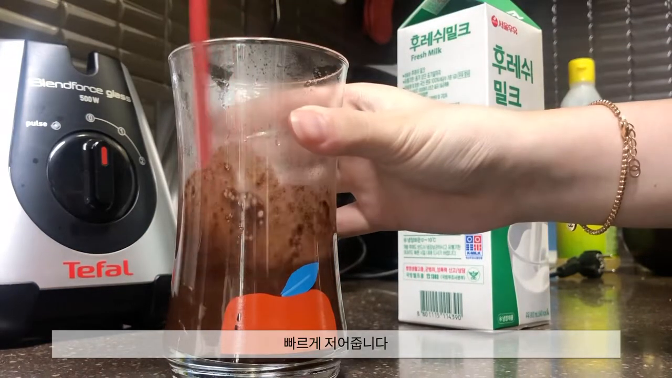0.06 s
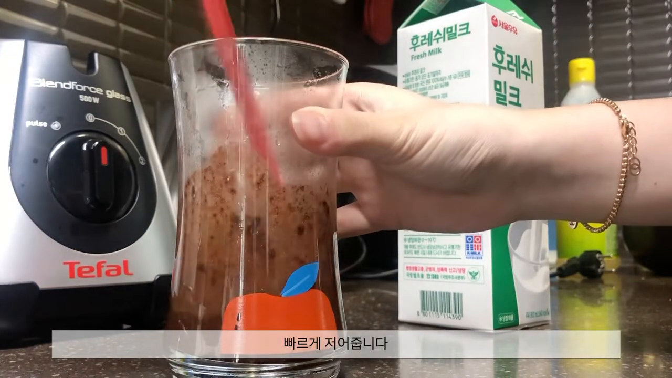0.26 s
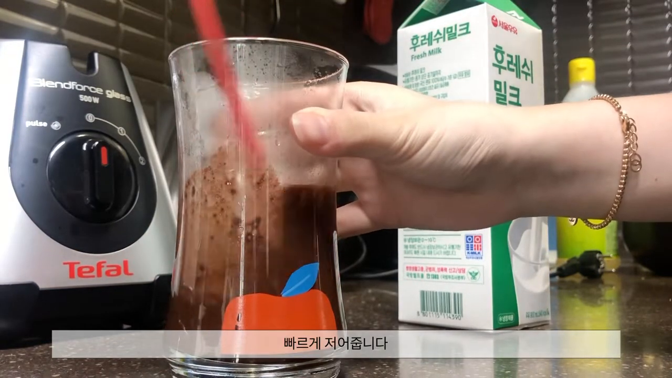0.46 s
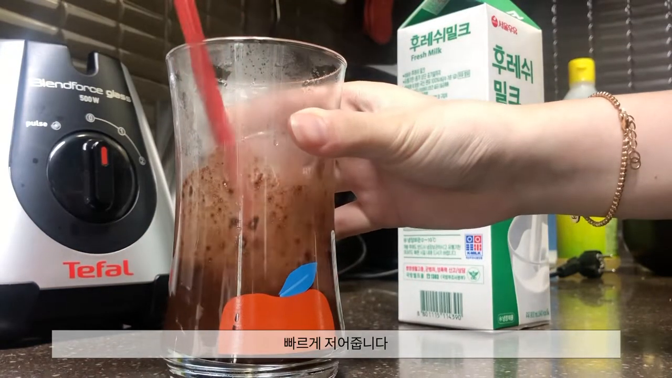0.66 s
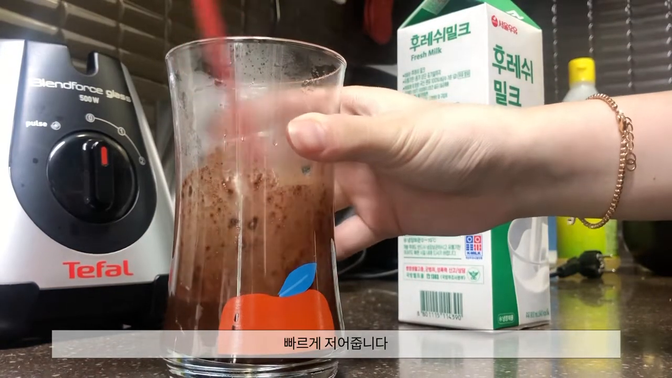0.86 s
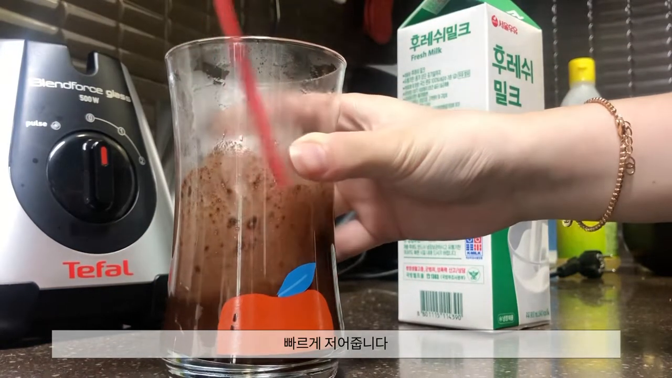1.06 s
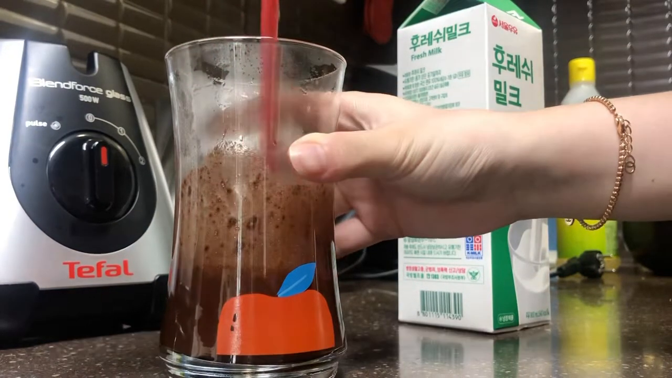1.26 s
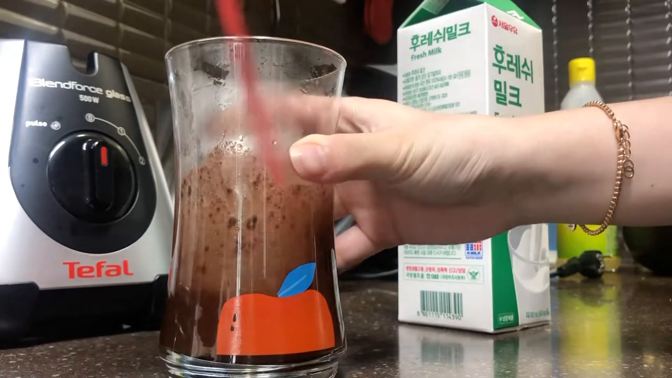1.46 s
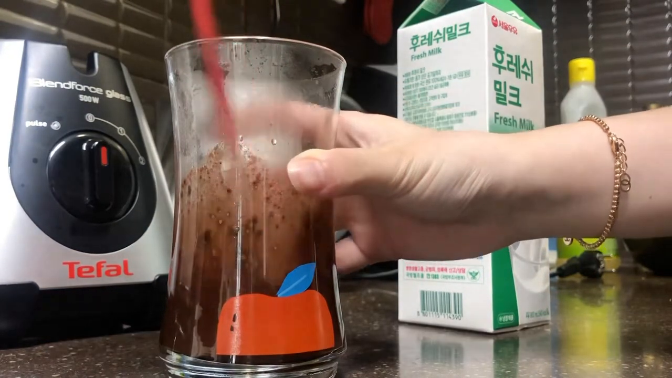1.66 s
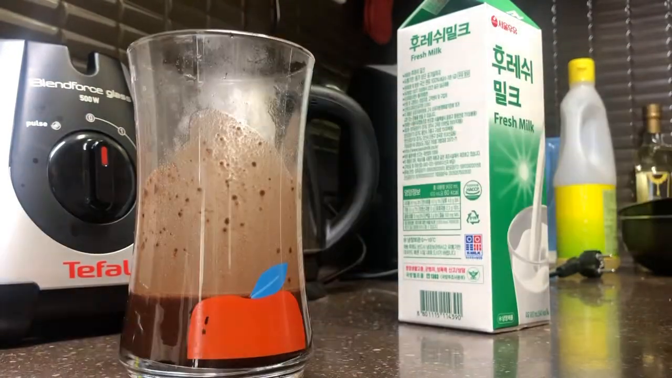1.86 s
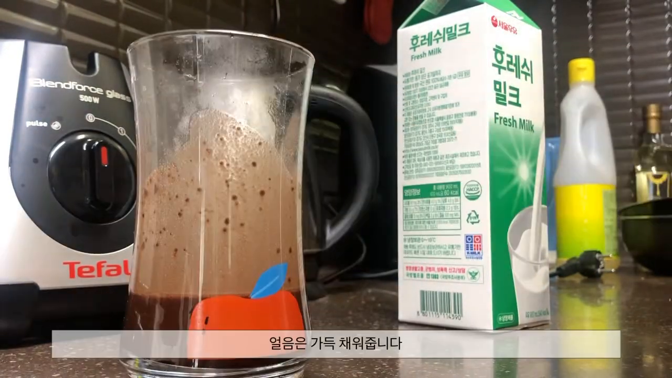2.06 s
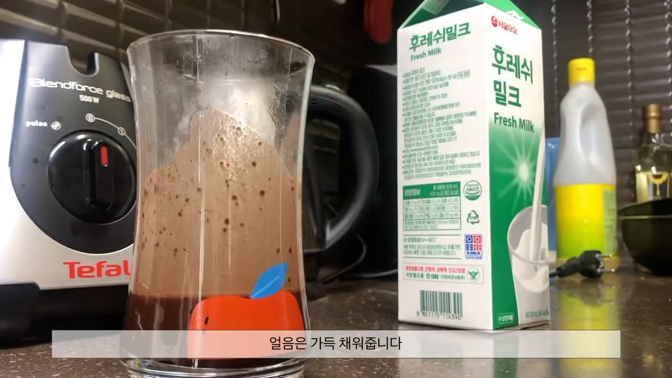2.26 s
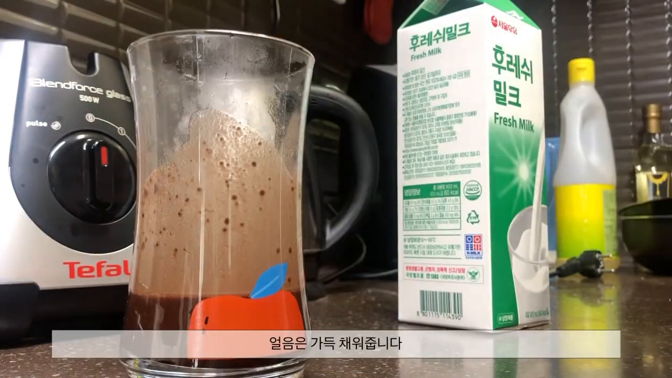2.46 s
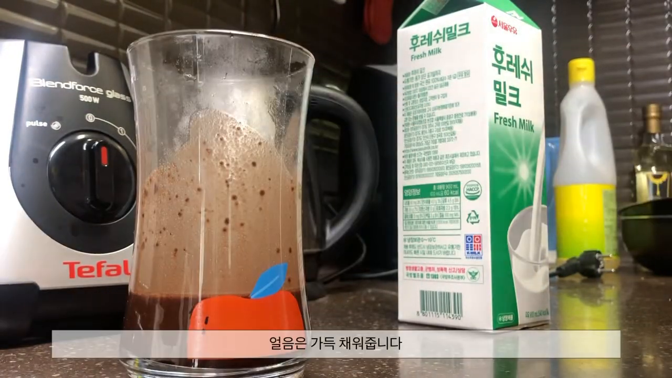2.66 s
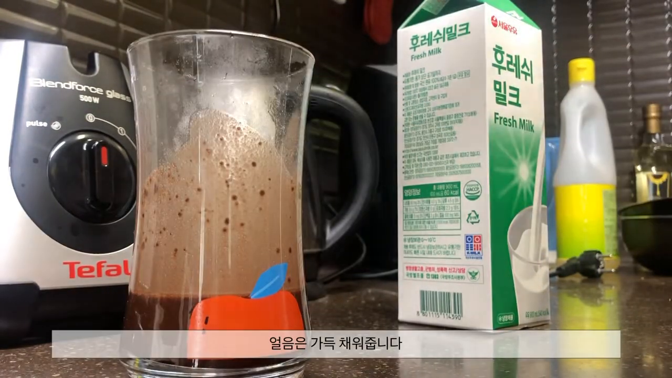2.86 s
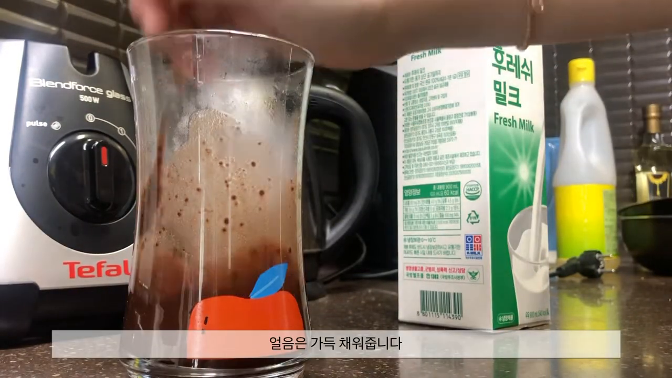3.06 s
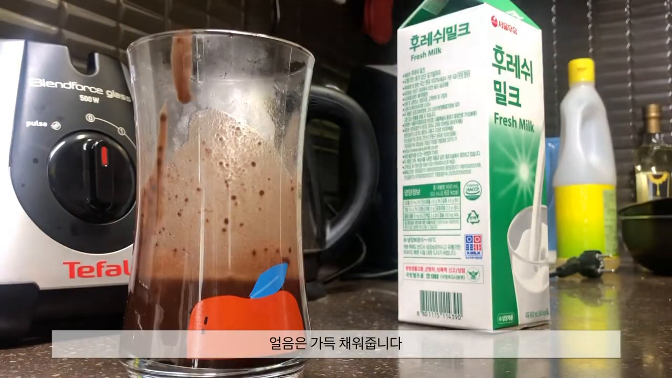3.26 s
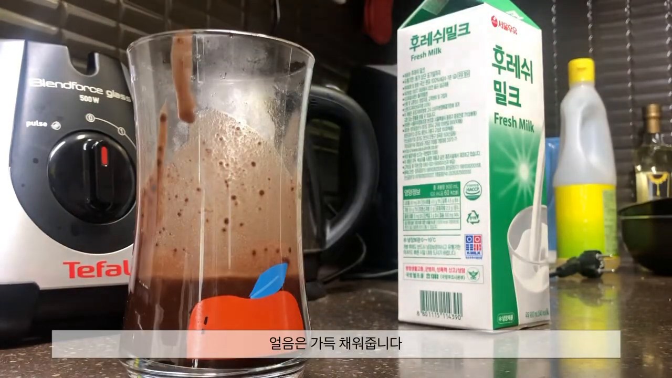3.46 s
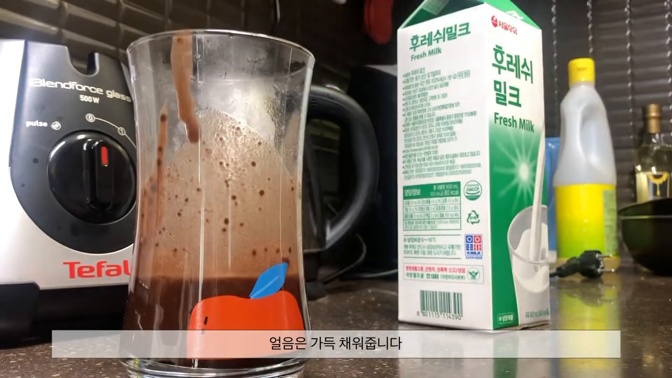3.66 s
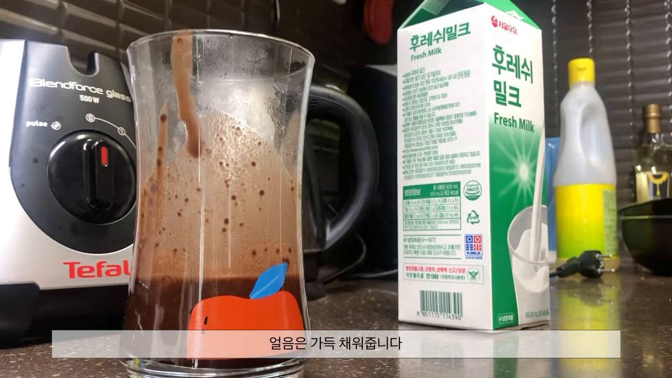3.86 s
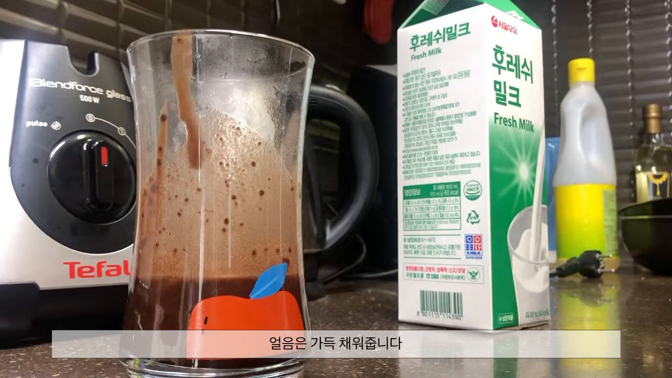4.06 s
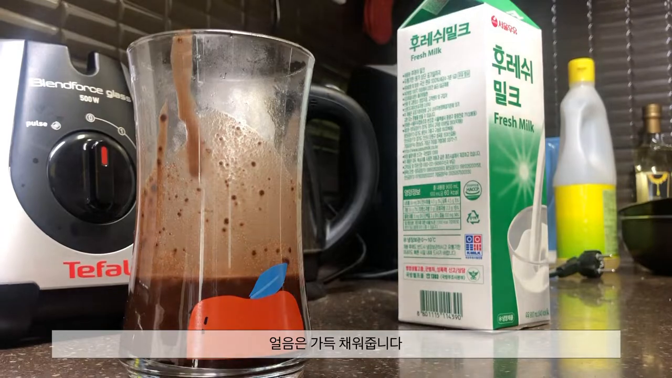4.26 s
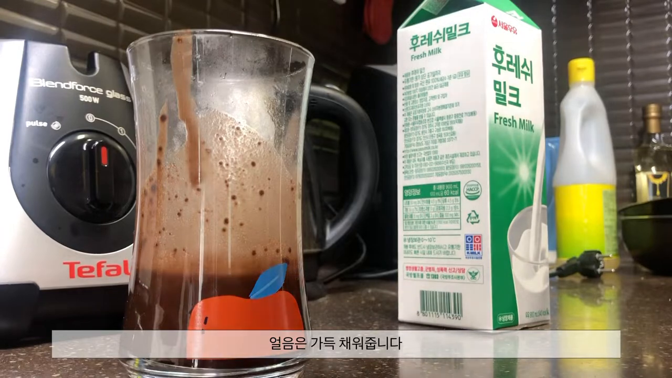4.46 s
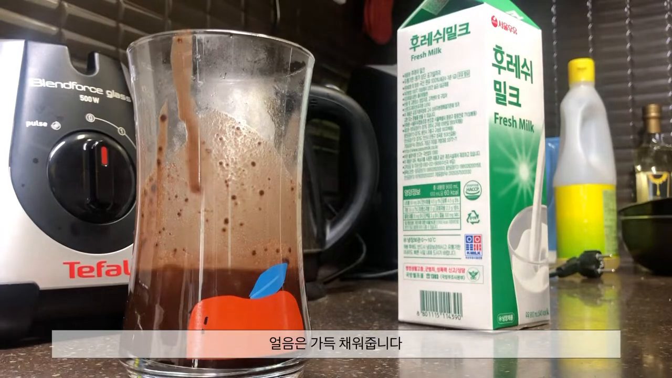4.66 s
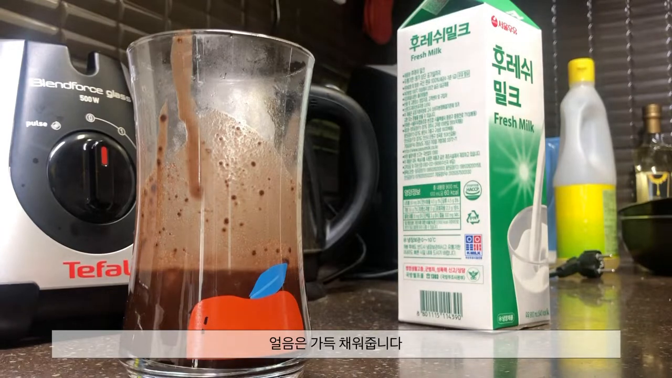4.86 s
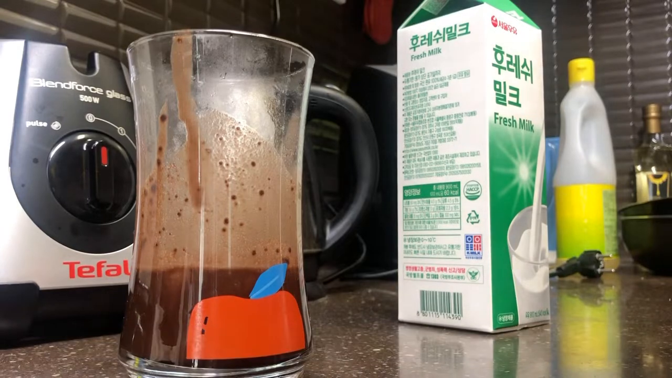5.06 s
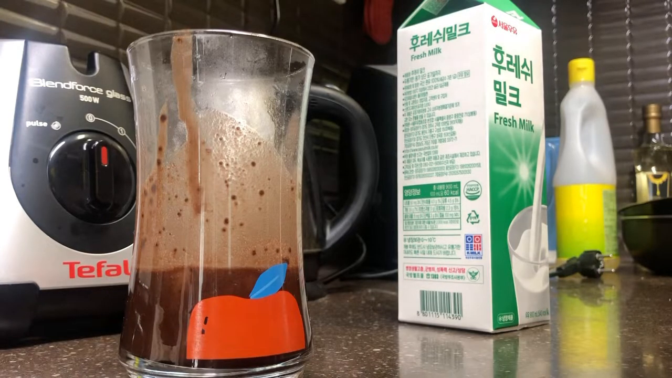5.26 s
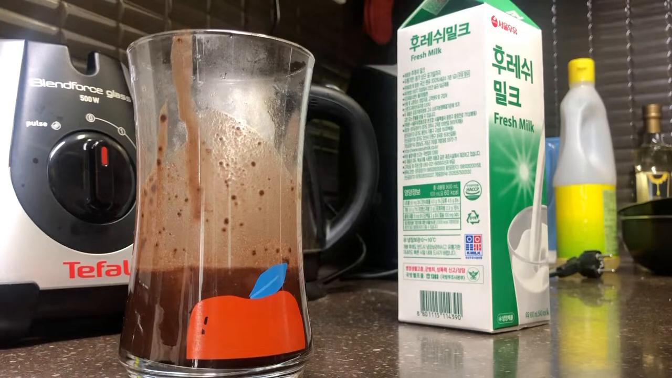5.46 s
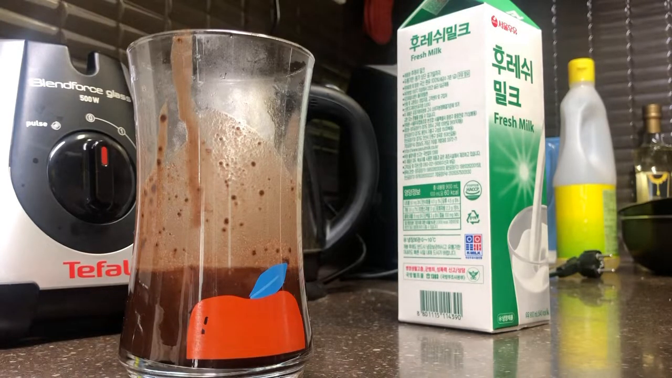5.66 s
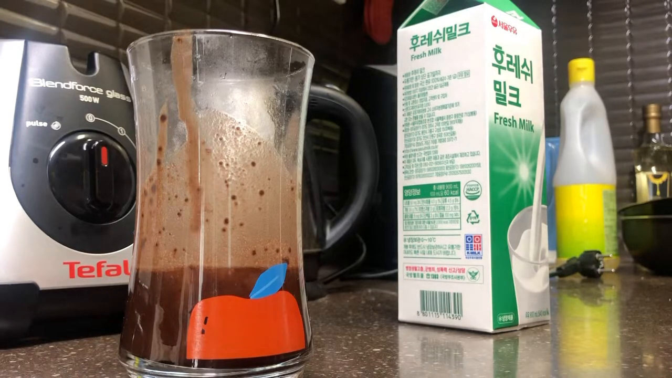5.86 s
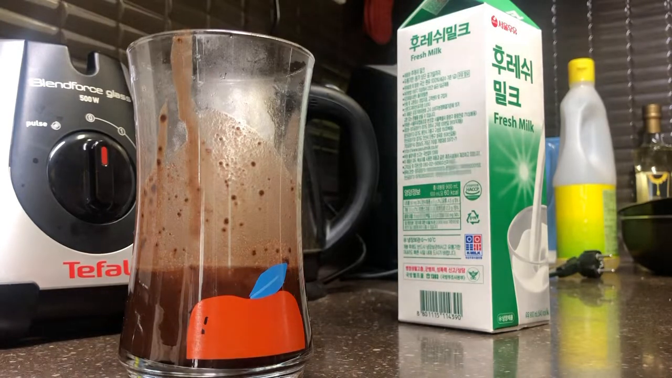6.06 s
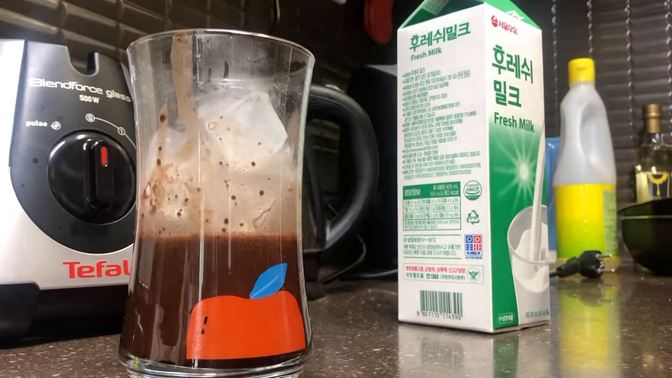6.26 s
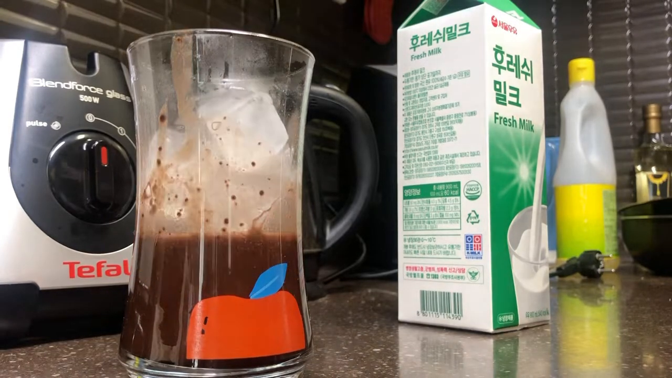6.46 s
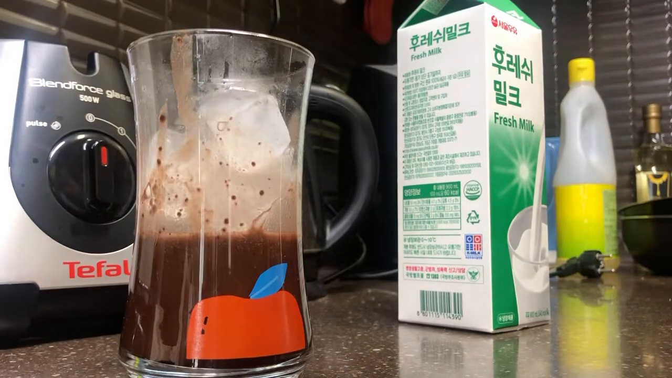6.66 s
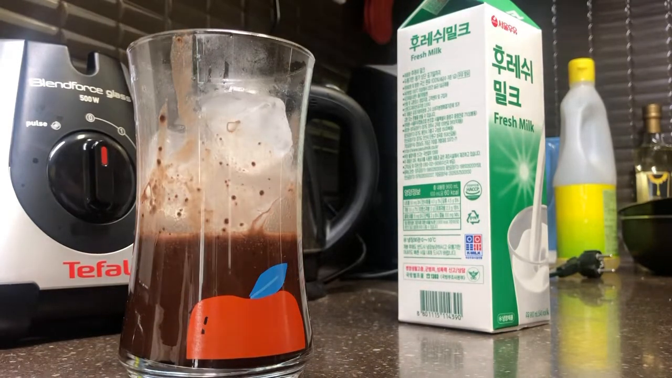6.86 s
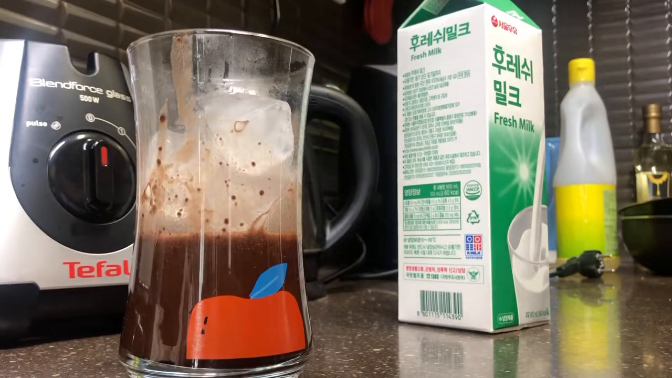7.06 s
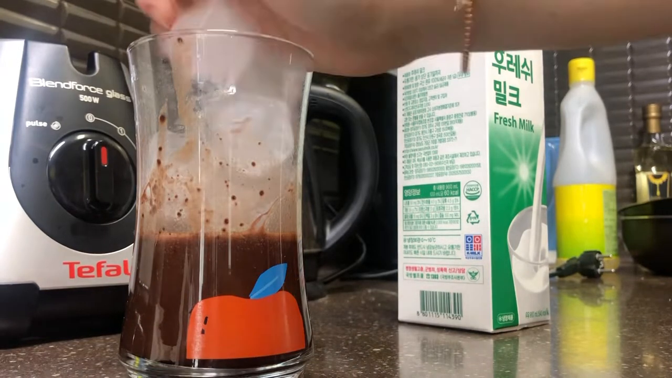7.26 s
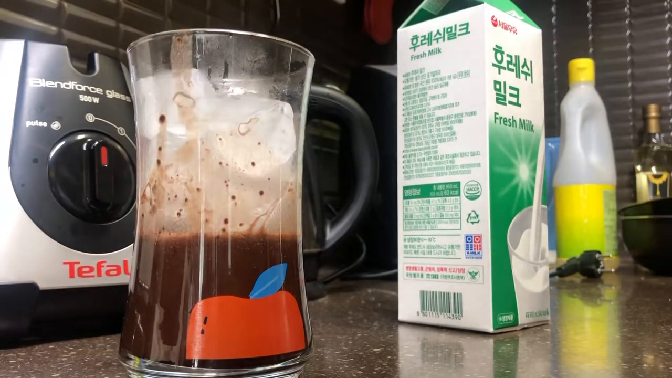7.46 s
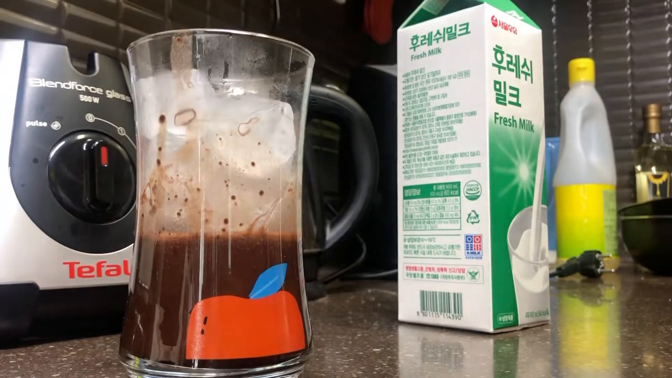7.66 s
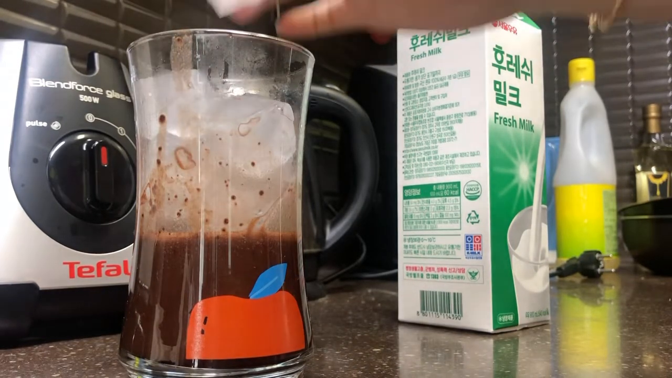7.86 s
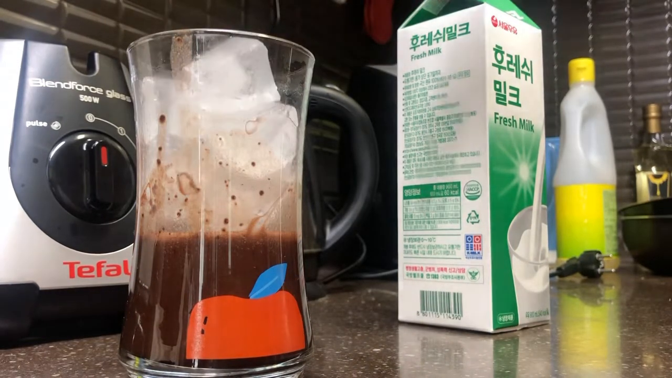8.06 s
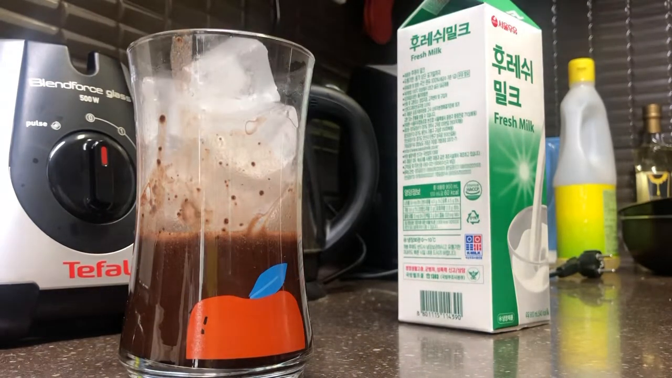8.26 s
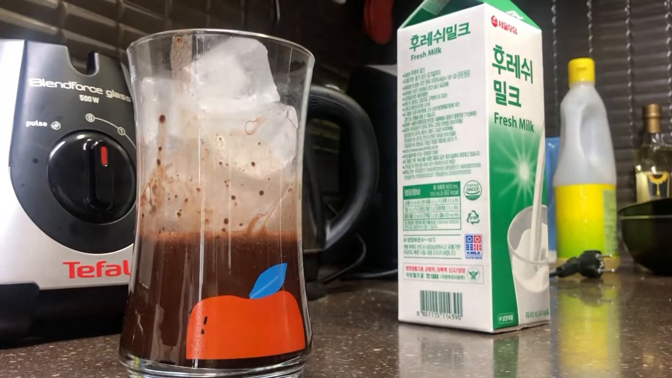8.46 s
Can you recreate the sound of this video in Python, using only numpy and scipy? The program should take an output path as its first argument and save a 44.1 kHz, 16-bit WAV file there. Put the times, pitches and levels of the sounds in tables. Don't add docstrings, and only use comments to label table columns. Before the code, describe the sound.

A close phone microphone in a small tiled kitchen, with faint refrigerator hum and short reflections. From 0 to 1.7 s a plastic spoon stirs quickly in a tall wet glass: irregular hollow knocks, light ticks, brief scrapes and swirling liquid, strongest around 0.5 to 1.0 s, then sparser. At 1.7 s an abrupt cut. A plastic bag crackles, busiest at 2.2 to 2.6 s, and ice cubes clatter into the glass at 2.9 to 3.2 s with hard knocks and bright ringing. More crinkling at 3.4 to 4.1 s, a sharp drop at 4.3 s, rustling from 4.8 to 5.9 s. A dense clatter at 6.13 s is cut off at 6.25 s. Crisp crackling at 6.6 to 7.0 s, a glassy but short drop at 7.25 s, snaps at 7.5 to 7.7 s, and a soft, dull last drop at 7.92 s. Then near quiet until about 8.6 s.

```python
import sys
import numpy as np
from scipy import signal
from scipy.fft import rfft, irfft, next_fast_len
from scipy.io import wavfile
from scipy.ndimage import uniform_filter1d

SR = 44100
rng = np.random.default_rng(int(sys.argv[2]) if len(sys.argv) > 2 else 0)


def generate_wav(sig):
    pcm = np.round(np.clip(np.atleast_2d(sig).T, -1, 1) * 32767).astype(np.int16)
    wavfile.write(sys.argv[1], SR, pcm)


def natural_amplitude(level_db):
    exponent = np.asarray(level_db, float) / 20
    return 10 ** exponent


N = 375732

CUT_S, TRIM_S = 1.715, 6.2545
LOW_CUT_HZ, TOP_HZ = 390, 16150
SMOTHER_DB = -8
CREASE_MS, CREASE_SCATTER_DB, COLOUR_SCATTER_DB = 5.5, 4, 12.5
TICK_MS = 5.1
CRUMPLE_DB, CRUMPLE_EDGE_S = -16, 0.017

# (frequency [Hz], level [dB per Hz])
AIR = [(15, -91), (25, -56.5), (124, -12.5), (399, -10.5), (538, -14.5), (726, -5.5), (831, -15.5),
       (1780, -18), (16500, -57)]
AIR_DB = -58.5
# (frequency [Hz], width [Hz], level [dB])
FRIDGE = [(135, 14, -74), (255, 16, -72), (732, 28, -66.5), (1065, 16, -71)]
# (frequency [Hz], t60 [s])
TILES = [(300, 0.11), (2000, 0.19), (6000, 0.094), (15000, 0.2)]

# (time [s], swirl [dB], fizz [dB], thrum [dB])
SLOSH = [
    (0.0, -43, -68, -84),
    (0.736, -40.5, -66, -72),
    (1.72, -49.5, -71, -92),
]
# (frequency [Hz], level [dB per Hz])
SWIRL = [(120, -11.5), (250, 0.5), (420, 4), (750, -3), (1200, -0.5), (1700, -13), (4000, -24), (8000, -73)]

# (time [s], blow [dB], tick [dB], glass ring [dB], handle pitch [Hz])
STIR = [(0.037, -43, -54, -57, 1160), (0.04, -28, -43, -55.5, 1170), (0.0558, -36.5, -41.5, -76, 1140),
        (.078, -45, -40, -45, 1200), (0.138, -55, -45.5, -54, 1150), (.144, -29.5, -42.5, -35.5, 835),
        (0.234, -28.5, -47, -38, 850), (0.2534, -31, -51.5, -45, 1020), (0.3166, -21.5, -20.5, -25, 510),
        (.345, -34.5, -64, -56, 377), (.4165, -32, -50.5, -46.5, 1200), (.459, -21.5, -18.5, -30, 530),
        (0.4732, -12.5, -41, -37.5, 580), (0.527, -41, -41.5, -42.5, 500), (0.568, -39, -50, -44, 805),
        (.607, -14, -16, -27, 503), (0.619, -16, -47, -39.5, 490), (0.667, -37, -37.5, -51.5, 720),
        (0.7107, -23.5, -35, -38, 675), (0.7569, -12, -17, -29, 508), (0.809, -19, -35, -20.5, 540),
        (0.828, -26, -40, -70, 795), (.873, -29.5, -43.5, -45, 1200), (0.9055, -15, -16, -25, 550),
        (0.9242, -7, -40.5, -26, 580), (0.966, -16.5, -30.5, -15, 830), (1.026, -33.5, -49, -47.5, 1160),
        (1.1403, -27.5, -28, -27.5, 450), (1.202, -49, -38.5, -38.5, 1110),
        (1.266, -38.5, -51.5, -46, 1170), (1.299, -29.5, -41.5, -35, 1150), (1.373, -34, -67, -38, 1085),
        (1.445, -25.5, -45.5, -43, 475), (1.4917, -32, -59, -42, 860), (1.526, -30, -21.5, -28, 487),
        (1.5489, -19, -30, -32.5, 513), (1.5786, -26.5, -57, -35, 1040), (1.6234, -23, -36, -33, 460)]
# (time [s], length [s], level [dB])
SCRAPES = [
    (0.034, 0.054, -41.5),
    (0.415, 0.026, -41),
    (1.297, 0.032, -42.5),
    (1.8, 0.03, -59),
]
# (time [s], body [dB], rim [dB])
CLINKS = [
    (.001, -34.5, -55),
    (0.809, -46, -40),
    (0.97, -44, -22),
]
# (frequency [Hz], level [dB], t60 [s])
WET_GLASS = [(2660, 2, 0.024), (3546, -13.5, 0.02), (4370, -19, 0.0059), (1200, -10, 0.027)]
# (frequency [Hz], level [dB], t60 [s])
WET_RIM = [(8550, -4, 0.017), (11800, -1.5, 0.012), (12500, -9.5, 0.037), (7900, -18.5, 0.029),
           (5370, -12.5, 0.028)]

# (start [s], length [s], crackle [dB], treble over bass [dB])
GRABS = [(2.27, 0.023, -41, -13.5), (2.341, 0.15, -40.5, -13), (2.434, 0.17, -48.5, -10.5),
         (2.78, 0.089, -60, 22), (3.409, 0.059, -44.5, 2.5), (3.506, 0.17, -53.5, -7.5),
         (5.581, .13, -53, -24), (3.749, 0.064, -59, 16), (3.93, 0.1, -39, 2), (4.927, 0.039, -35.5, -6.5),
         (5.031, 0.13, -47.5, -5), (5.239, 0.19, -45.5, -11.5), (5.755, 0.08, -36, -18),
         (5.86, 0.064, -43.5, -25.5), (6.589, 0.086, -44, 29.5), (6.685, 0.087, -35.5, -1),
         (6.799, .07, -38, 1), (6.873, .1, -38.5, 4), (7.603, 0.087, -47.5, 33.5)]
# (time [s], peak [dB], treble over bass [dB], length [ms])
SNAPS = [(2.418, -28.5, -0.5, 6.6), (2.4391, -28, 2, 15), (2.4732, -26.5, -3.5, 6), (2.5275, -24, 9, 5.5),
         (3.7334, -50.5, 14, 10), (3.779, -37.5, 22, 5.5), (3.8052, -37.5, 11.5, 45), (3.9511, -39, 6, 84),
         (4.0612, -32.5, 1, 17), (4.926, -33, 1, 13), (4.9473, -23.5, 14, 6), (5.0397, -28, -5.5, 5.9),
         (5.069, -21, 7.5, 3), (5.1461, -30, -6, 2.3), (5.765, -26.5, 0, 13), (5.783, -23, -6.5, 30),
         (5.851, -28, -21, 53), (6.5902, -32.5, 9, 8.9), (6.623, -31, 6.5, 10), (6.7222, -24, 24.5, 1.2),
         (6.832, -26.5, -0.5, 5.4), (6.86, -29, -6, 11), (6.935, -32, -1.5, 15), (6.9629, -33.5, 3.5, 2.2),
         (6.984, -35, 9, 25), (7.6047, -24, -1.5, 20), (7.661, -26.5, 1, 44)]
# (time [s], peak [dB], treble over bass [dB])
TICKS = [(1.746, -27, 0), (1.883, -40.5, -0.5), (2.1418, -35.5, -10), (2.249, -41.5, 4.5),
         (2.611, -36, -10), (3.2794, -41, -11), (3.342, -44.5, 0), (3.5585, -39.5, -12), (3.8361, -33.5, 4),
         (3.9005, -22.5, 3.5), (4.5744, -38, -8.5), (4.7257, -35.5, -8.5), (4.8121, -20, 13),
         (4.873, -25, 5), (5.495, -38.5, -9.5), (5.5518, -31, -29), (6.262, -43.5, 2.5),
         (6.2766, -40, -1.5), (6.2982, -51, 11), (6.376, -33.5, -9), (6.4648, -36, 4), (6.5291, -34, 4.5),
         (7.017, -23.5, -6), (7.4053, -42.5, -1), (7.4366, -32.5, -1), (7.4646, -31, 25), (7.509, -51, 15),
         (7.534, -24, -4.5), (7.571, -41, 13), (8.443, -45, -2)]
# (frequency [Hz], level [dB per Hz])
FILM = [(290, -45.5), (500, 5), (1890, 2), (3800, 3), (6500, 1), (8500, 0), (15100, -8.5), (16500, -18)]
# (time [s], treble [dB], bass
# [dB])
CRACKS = [(2.2343, -33.5, -54.5), (2.2503, -25, -46.5), (2.3506, -31.5, -42.5), (2.365, -30.5, -47.5),
          (2.392, -47, -40), (2.3972, -22.5, -39.5), (2.417, -25, -32), (2.4404, -26, -28),
          (2.449, -29, -36), (2.4718, -20, -30), (2.482, -31, -32.5), (2.488, -24.5, -32),
          (2.521, -30, -37.5), (2.537, -18.5, -42.5), (2.55, -26.5, -41.5), (2.5985, -41.5, -44),
          (3.7331, -20, -41.5), (3.7517, -31, -47.5), (3.7693, -22.5, -51), (3.778, -15, -58),
            (3.8104, -21, -42.5), (3.8358, -24.5, -41), (3.9029, -21.5, -37), (3.9372, -27, -50),
            (3.953, -27.5, -41.5), (4.0071, -32, -40), (4.058, -28, -42),
          (4.9253, -23, -42), (4.9458, -23, -37.5), (4.963, -27, -37.5), (5.0006, -35.5, -41),
            (5.0196, -30.5, -33.5), (5.032, -30.5, -34), (5.0426, -24.5, -35.5), (5.0675, -18.5, -44),
            (5.101, -37, -37), (5.1234, -30, -41), (5.1458, -23, -40), (5.169, -33.5, -36.5),
            (5.182, -29, -47.5), (5.2496, -32, -39.5), (5.2576, -34, -45.5), (5.269, -35.5, -45),
            (5.3103, -39.5, -51.5), (5.3369, -32, -42), (5.3608, -29.5, -36),
          (5.7558, -22, -33.5), (5.7668, -26, -38.5), (5.7822, -30.5, -33.5), (5.8457, -40, -27),
            (5.8555, -33.5, -36), (5.9113, -41.5, -45),
          (6.5906, -21.5, -46.5), (6.6232, -25.5, -47), (6.6698, -22.5, -41.5), (6.6905, -22, -37),
            (6.7211, -13, -45), (6.7989, -25.5, -57), (6.8201, -20, -31.5), (6.8323, -18.5, -52),
            (6.8653, -20.5, -33.5), (6.9225, -33, -44), (6.9305, -36.5, -45.5), (6.9616, -17, -47),
            (6.9851, -22.5, -43), (7.0219, -30.5, -30),
          (7.6025, -25, -65),
    (7.6623, -25.5, -55),
          (3.7616, -22.5, -50), (6.6026, -25.5, -45), (6.6355, -23.5, -40), (6.6524, -24.5, -43.5),
            (6.6996, -21.5, -45), (6.7368, -21.5, -37.5), (6.7674, -27.5, -49.5), (6.8106, -23.5, -39),
            (6.844, -23, -37), (6.8876, -31, -54), (7.6246, -32, -44), (7.6855, -25, -50.5)]

# (time [s], tick [dB], knock pitch [Hz], knock [dB], bowl [dB])
DROP_1 = [(2.9317, -20.5, 1600, -8.5, -24), (2.9518, -55, 1520, -34.5, -24),
          (2.979, -18.5, 1570, -25.5, -19), (2.9957, -49, 1724, -29.5, -49),
          (3.0044, -27.5, 1860, -17, -28), (3.0335, -40.5, 1690, -34.5, -48.5),
          (3.0426, -32, 730, -34, -29), (3.0738, -24.5, 1940, -4.5, -40.5), (3.0808, -17, 1800, -16, -14.5),
          (3.1084, -37, 1990, -13.5, -34.5), (3.1956, -52.5, 1840, -38, -48),
          (3.2112, -73, 1960, -34, -41.5)]
DROP_2 = [(4.3243, -44.5, 1936, -16, -21), (4.33, -11.5, 2000, -4.5, -18.5),
          (4.3397, -25.5, 2120, -10, -21), (4.3465, -34.5, 1600, -22.5, -32),
          (4.3922, -57.5, 2140, -37.5, -43.5), (4.4405, -63, 1890, -37, -47), (4.47, -41, 1840, -33, -32.5),
          (4.5158, -40, 610, -34, -71), (5.2509, -67, 549, -30, -78)]
DROP_3 = [(6.1275, -18, 1864, -19.5, -18.5), (6.1484, -12.5, 1980, -20, -14.5),
          (6.155, -19.5, 1744, -24, -19), (6.1749, -20, 1800, -5.5, -40.5),
          (6.1821, -13, 1954, -11.5, -25.5), (6.2001, -31.5, 1797, -17.5, -24.5),
          (6.2226, -25, 1352, -9.5, -30), (6.2252, -17.5, 2260, -5.5, -14.5),
          (6.2355, -36, 1280, -21.5, -20.5), (6.241, -25.5, 1126, -22, -10),
          (6.2476, -31, 2140, -16, -35.5)]
DROP_4 = [(7.242, -16.5, 2206, -14, 1.5), (7.2565, -46, 1255, -27.5, -30), (7.262, -24, 1480, -23.5, -24),
          (7.2665, -13, 905, -16.5, -18.5), (7.2768, -30.5, 1115, -27, -26),
          (7.2857, -31, 1223, -24.5, -42.5), (7.294, -35, 2088, -32, -40), (7.299, -23.5, 2020, -31, -20.5),
          (7.312, -20.5, 1174, -22.5, -9.5)]
DROP_5 = [(7.9194, -24.5, 2234, -24, -54), (7.925, -34.5, 590, -23.5, -18), (7.931, -46, 1108, -28, -48),
          (7.9388, -46.5, 1430, -28.5, -43), (7.9479, -36, 690, -30.5, -54),
          (7.958, -42.5, 660, -31.5, -45)]
DROPS = [DROP_1, DROP_2, DROP_3, DROP_4, DROP_5]
FREEDOM = [1, .78, .7, .2, .2]
# (time [s], pitch [Hz], level [dB])
PINGS = [
    (2.932, 1680, -28),
    (3.0085, 1590, -22),
]
# (time [s], rim [dB], lip [dB], lip pitch [Hz])
WALL = [(2.9323, -19.5, -19, 12140), (2.9514, -36.5, -33.5, 11900), (2.9782, -20.5, -22.5, 12480),
        (3.0034, -34, -36.5, 11800), (3.042, -35, -33, 11530), (3.0779, -26, -13, 11970),
        (4.3249, -34.5, -19.5, 12220), (4.3384, -26, -34.5, 12890), (6.1286, -23.5, -20.5, 12800),
        (6.1477, -11, -29.5, 11570), (6.1533, -25.5, -23, 12700), (6.1832, -30, -36.5, 11490),
        (6.2412, -33, -36.5, 12510), (6.2464, -23.5, -34, 11960), (7.2418, -10.5, -21, 12670),
        (7.2665, -12.5, -23, 12700), (7.3142, -25, -16.5, 12820), (7.917, -46, -42.5, 13100)]
# (frequency [Hz], level [dB per Hz])
CRACK = [(450, -15.5), (900, -3.5), (2000, -0.5), (4800, -15), (7000, -24), (12000, -37.5)]
# (frequency [Hz], level [dB], t60 [s])
BOWL = [(4168, 3, 0.028), (4130, -19, 0.08)]
# (frequency [Hz], level [dB], t60 [s])
RIM = [(7830, 2, 0.05), (7820, -14, 0.3)]
# (ratio to its pitch [1], level [dB], t60 [s])
LIP = [(0.999, -0.5, 0.023), (0.999, -16, 0.093), (1.06, -6, .02)]


def unit(x):
    return x / np.sqrt(np.mean(x ** 2) + 1e-20)


def along(points, hz):
    f, v = np.transpose(points)
    return np.interp(np.log(hz + 1), np.log(f + 1), v)


def curves(rows):
    s, *cols = np.transpose(rows)
    return [np.interp(np.arange(N) / SR, s, c, -140, -140) for c in cols]


def filtered(x, response):
    m = next_fast_len(len(x) + 4096)
    return irfft(rfft(x, m) * response(np.fft.rfftfreq(m, 1 / SR)), m)[:len(x)]


def coloured(x, spectrum):
    return unit(filtered(x, lambda hz: natural_amplitude(along(spectrum, hz))))


def add(track, s, sound):
    part = track[round(s * SR):][:len(sound)]
    part += sound[:len(part)]


def ring(modes, t, scatter_db, freedom=1, rough=0.031):
    out = 0
    for hz, db, t60 in modes:
        wander = rough * np.cumsum(rng.standard_normal(len(t)))
        phase = 2 * np.pi * hz * rng.normal(1, .005) * t + wander
        decay = natural_amplitude(db + rng.normal(0, scatter_db) - 60 * t / (t60 * freedom))
        out = out + decay * np.sin(phase)
    return out


def burst(noise, t, t60, rise):
    start = rng.integers(len(noise) - len(t))
    return noise[start:start + len(t)] * natural_amplitude(-60 * t / t60) * (1 - np.exp(-t / rise))


def grains(rate, spread_db, t60):
    starts = (rng.random(N) < rate / SR) * natural_amplitude(spread_db * np.minimum(rng.exponential(1, N), 3))
    shape = signal.lfilter([1], [1, -natural_amplitude(-60 / (t60 * SR))], starts)
    return shape * rng.standard_normal(N)


def untrimmed(s, t):
    return (s > TRIM_S) | (s + t < TRIM_S)


def kitchen():
    out = natural_amplitude(AIR_DB) * coloured(rng.standard_normal(N), AIR)
    for hz, width, db in FRIDGE:
        band = filtered(rng.standard_normal(N), lambda f: 1 / (1 + (2 * (f - hz) / width) ** 2))
        out = out + natural_amplitude(db) * unit(band)
    return out


def cocoa():
    swirl_db, fizz_db, thrum_db = curves(SLOSH)
    swirl = coloured(grains(120, 3, .035), SWIRL)
    froth = grains(500, 4, .03)
    fizz = coloured(froth, [(2000, -23.0), (4000, 1.5), (9000, 0.0), (13000, -18), (16000, -9)])
    thrum = coloured(rng.standard_normal(N), [(40, -55), (75, 7), (110, 4.5), (250, -58.0)])
    return natural_amplitude(swirl_db - 9.5) * swirl + natural_amplitude(fizz_db + 1.0) * fizz + natural_amplitude(thrum_db + 12.0) * thrum


def clinks():
    out, t = np.zeros(N), np.arange(SR // 8) / SR
    for s, body_db, rim_db in CLINKS:
        body = ring(WET_GLASS, t, 1)
        rim = ring(RIM, t, 1, .55, rough=.13)
        add(out, s, natural_amplitude(body_db) * body + natural_amplitude(rim_db) * rim)
    return out


def spoon():
    out, t = np.zeros(N), np.arange(SR // 12) / SR
    bright = coloured(rng.standard_normal(SR), [(2500, -5), (5000, 3.5), (9000, 11.5), (12500, 9),
                                                (16500, 4.5)])
    splash = coloured(grains(700, 3.1, 0.0088), [(130, -22.0), (420, 2), (700, -6.5), (1200, -2),
                                                 (1800, -12.5), (4000, -39.0)])
    for s, bend_db, tick_db, ring_db, handle_hz in STIR:
        rim = .6 * ring(WET_RIM, t, 3, rough=.17)
        tick = 0.8 * burst(bright, t, 0.008, 0.00005) + .05 * burst(bright, t, 0.06, .002) + rim
        glass = ring(WET_GLASS, t, 2, rough=.11)
        pitch_hz = handle_hz + (2000 - handle_hz) * np.exp(-t / 0.0022)
        bend_shape = natural_amplitude(-60 * t / .013) * (1 - np.exp(-t / .0014)) ** 2
        bend = np.sin(2 * np.pi * np.cumsum(pitch_hz) / SR) * bend_shape
        column = ring([(1190, 4, .07)], t, 3, rough=.07)
        wet = column + 11.7 * bend + 0.77 * burst(splash, t, 0.063, 0.00054)
        add(out, s, natural_amplitude(tick_db + 1.5) * tick + natural_amplitude(ring_db + 3) * glass + natural_amplitude(bend_db - 10.5) * wet)
    rasp = coloured(grains(1600, 1.5, 0.014), [(300, -23.0), (1200, 1.5), (1800, -11), (2700, -10),
                                               (4000, -24.5), (7700, -15.5), (9500, -27.0), (16000, -19.5)])
    for s, length, db in SCRAPES:
        drag = natural_amplitude(db - 60 * np.clip(t - length, 0, None) / 0.015)
        add(out, s, drag * burst(rasp, t, 0.9, 0.00045))
    return out


def creases():
    per_grab = 8
    place = rng.random((len(GRABS), per_grab))
    luck = rng.standard_normal((len(GRABS), per_grab, 3))
    small = []
    for g, (s, length, db, tilt_db) in enumerate(GRABS):
        for k, (a, b, c) in enumerate(luck[g]):
            when = s + length * (k + place[g, k]) / per_grab
            small.append((when, db + CREASE_SCATTER_DB * a, tilt_db + COLOUR_SCATTER_DB * b,
                          CREASE_MS * np.exp(.5 * c)))
    return small + SNAPS + [(*tick, TICK_MS) for tick in TICKS]


def bag():
    out, effort, t = np.zeros(N), np.zeros(N), np.arange(SR // 10) / SR
    low = coloured(grains(1200, 0.96, 0.0054), [(250, -19.0), (700, -9.5), (1600, -0.5), (2600, -10.0),
                                                (6000, -28.5)])
    high = coloured(grains(1100, 1.5, .009), [(2500, -6), (4500, -1.5), (6200, -2.5), (9000, -1),
                                              (15000, -7.0), (17000, -21.5)])
    for s, db, tilt_db, ms in creases():
        share = 1 / (1 + natural_amplitude(-tilt_db) ** 2)
        first_give = 1 + 0.84 * np.exp(-t / 0.00053)
        lasting = natural_amplitude(-9 * (t / (ms / 1000)) ** 1.6) * first_give
        panel_filter = signal.iirpeak(4600 * 2.2 ** rng.random(), 4, SR)
        panel = signal.lfilter(*panel_filter, burst(high, t, 0.13, 0.0035))
        dull = burst(low, t, 0.15, 0.00014)
        bright = burst(high, t, 0.36, 0.0003) + 3.6 * panel
        noise = np.sqrt(1 - share) * dull + np.sqrt(share) * bright
        size = np.sqrt(np.sum((lasting * noise) ** 2) / np.sum(lasting ** 2))
        add(out, s, natural_amplitude(db - 8.5) * (lasting + 0.018) * noise / size)
        add(effort, s - .015, natural_amplitude(db) * np.hanning(len(t)) * natural_amplitude(-60 * t / 0.086))
    for s, length, db, _ in GRABS:
        add(effort, s, np.full(round(length * SR), natural_amplitude(db + CRUMPLE_DB)))
    effort = uniform_filter1d(effort, size=round(CRUMPLE_EDGE_S * SR))
    crumple = coloured(grains(1400, 3, 0.0058), FILM)
    return out + (0.41 * effort + natural_amplitude(-74.0)) * crumple


def cracks():
    out, t = np.zeros(N), np.arange(SR // 30) / SR
    spit = coloured(rng.standard_normal(SR), [(2500, -12.5), (4500, -9.5), (6500, 2.5), (9000, 0.5),
                                              (14000, -4), (17000, -5)])
    pop = coloured(rng.standard_normal(SR), [(400, -40.0), (900, -8), (1700, -0.5), (2800, -10),
                                             (5000, -18.0)])
    events = CRACKS
    for s, treble_db, bass_db in events:
        bright = burst(spit, t, 0.0045, .0001) + 0.34 * burst(spit, t, 0.041, 0.00052)
        bright = bright + ring([(6117, -9.5, 0.014)], t, 4.4, rough=.25)
        dull = burst(pop, t, 0.017, 0.00045)
        add(out, s, natural_amplitude(treble_db - 8.5) * bright + natural_amplitude(bass_db + 0.5) * dull)
    return out


def patchy(x, depth_db):
    z = signal.stft(x, nperseg=256)[2]
    field = uniform_filter1d(rng.standard_normal(z.shape), size=4, axis=0)
    field = uniform_filter1d(field, size=6, axis=1)
    return signal.istft(z * natural_amplitude(depth_db * unit(field)), nperseg=256)[1][:N]


def ice():
    out, t = np.zeros(N), np.arange(SR // 8) / SR
    broad = coloured(rng.standard_normal(SR), CRACK)
    sharp = coloured(rng.standard_normal(SR), [(2000, -29.5), (5000, -2.5), (9000, -3.5), (16000, -8.5)])
    swell = 1 - np.exp(-t / 0.00042)
    for drop, freedom in zip(DROPS, FREEDOM):
        for s, tick_db, hz, knock_db, bowl_db in drop:
            harder = [later[0] - s for later in drop if later[0] > s + .012 and later[3] > knock_db]
            stop = min(harder + [1])
            smother = natural_amplitude(-60 * np.clip(t - stop, 0, None) / .02)
            knock_modes = [(hz, 0, .016), (.6 * hz, -15, .015), (1.04 * hz, -25, .08 * freedom),
                           (1110, -27, .1 * freedom), (1300, -28, .1 * freedom),
                           (2.3 * hz, -13, .01), (3 * hz, -15, .008), (640, -15, .022)]
            knock = ring(knock_modes, t, 2, rough=.075)
            knock = knock + 1.08 * burst(broad, t, 0.0072, 0.0014) + 0.55 * burst(broad, t, 0.026, 0.00043)
            bowl = ring(BOWL, t, 1.0, freedom ** 2.5 + .05, rough=0.065 / freedom ** .5)
            glass = natural_amplitude(bowl_db + 2.0) * bowl
            tick = 1.2 * burst(sharp, t, 0.006, 0.00012) + 0.07 * burst(sharp, t, 0.05, .001)
            hit = swell * (natural_amplitude(knock_db + 1.5) * knock + glass * smother) + natural_amplitude(tick_db + 2.0) * tick
            add(out, s, hit * untrimmed(s, t))
    for s, hz, db in PINGS:
        add(out, s, natural_amplitude(db) * ring([(hz, 0, .075)], t, 0, rough=0.045) * swell)
    return out


def wall():
    out, t = np.zeros(N), np.arange(SR // 5) / SR
    hard = [row[0] for drop in DROPS for row in drop if row[3] > SMOTHER_DB]
    for s, rim_db, lip_db, lip_hz in WALL:
        drops_begun = sum(drop[0][0] < s + .01 for drop in DROPS)
        freedom = FREEDOM[drops_begun - 1]
        stop = min([h - s for h in hard if h > s + .012] + [1])
        smother = natural_amplitude(-60 * np.clip(t - stop, 0, None) / .012)
        lip = ring([(k * lip_hz, db, t60) for k, db, t60 in LIP], t, 1, freedom, rough=.11)
        rim = ring(RIM, t, .5, freedom, rough=.025 / freedom)
        sound = natural_amplitude(rim_db - 5.0) * rim + natural_amplitude(lip_db + 1.0) * lip
        add(out, s, sound * (1 - np.exp(-t / 0.0001)) * smother * untrimmed(s, t))
    return out


def tiles(x):
    out, size = np.zeros(N), SR // 8
    for start in range(0, N, size):
        stretch = x[start:start + size]
        if not stretch.any():
            continue
        hz, t, z = signal.stft(rng.standard_normal(SR // 3), SR, nperseg=256)
        decay = natural_amplitude(-60 * t / along(TILES, hz)[:, None])
        tail = signal.istft(z * decay, SR, nperseg=256)[1]
        answer = signal.fftconvolve(stretch, tail / np.linalg.norm(tail))
        add(out, start / SR + 0.0043, answer)
    return out


def scene():
    thin = signal.butter(4, LOW_CUT_HZ, "high", fs=SR, output="sos")
    held = signal.butter(2, 150, "high", fs=SR, output="sos")
    out, t = kitchen() + cocoa(), np.arange(N) / SR
    stirring = signal.sosfilt(held, clinks() + spoon())
    digging = signal.sosfilt(held, patchy(bag() + cracks(), depth_db=3.5))
    dropping = signal.sosfilt(thin, ice() + wall())
    near = stirring + digging + dropping
    for start, end in ((0, CUT_S), (CUT_S, TRIM_S), (TRIM_S, 9)):
        shot = (t >= start) & (t < end)
        out = out + shot * (near + natural_amplitude(-14.0) * tiles(near * shot))
    return out[None]


def band_limit(x):
    return signal.sosfilt(signal.butter(12, 17020, fs=SR, output="sos"), x)


def record(dry):
    held = dry[0] / (1 + np.abs(dry[0] / .88) ** 10) ** .1
    held = dry[0] + filtered(held - dry[0], lambda hz: hz > LOW_CUT_HZ)
    mix = filtered(held, lambda hz: hz < TOP_HZ)[None]
    return band_limit(mix)


dry = scene()
out = record(dry)
generate_wav(out)
```